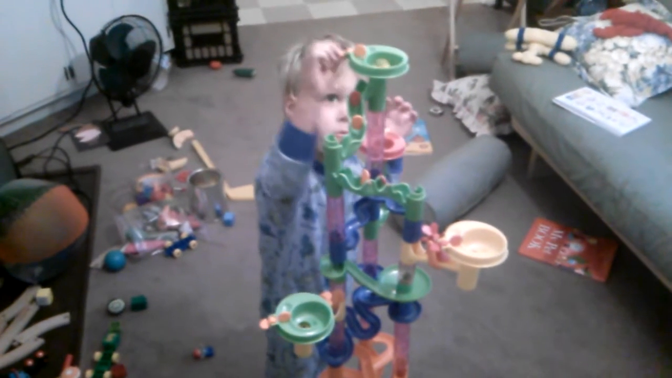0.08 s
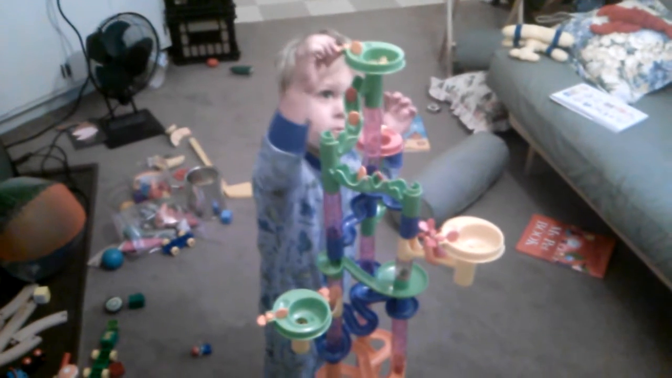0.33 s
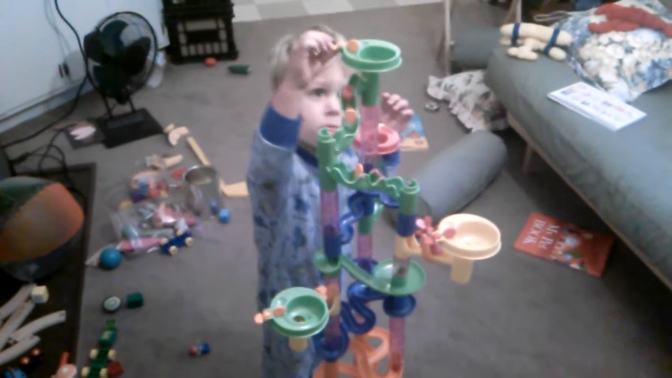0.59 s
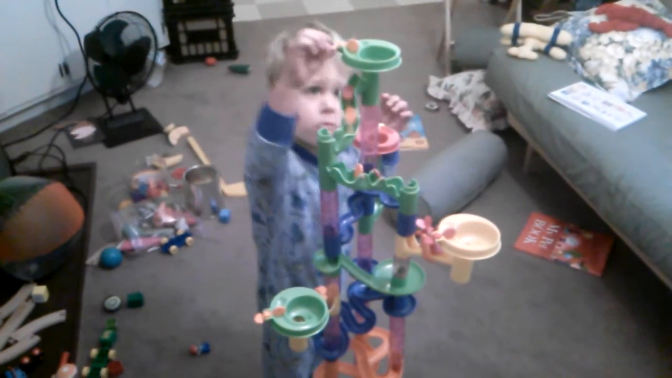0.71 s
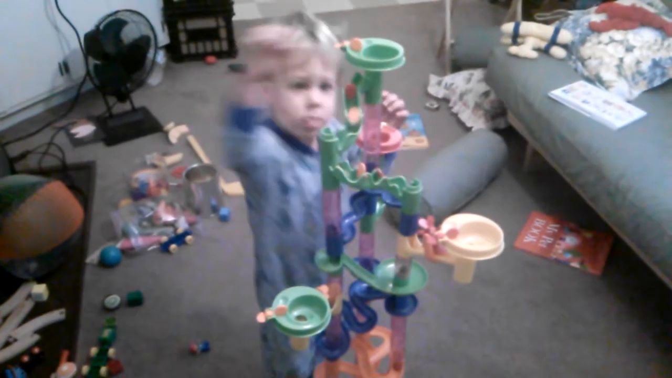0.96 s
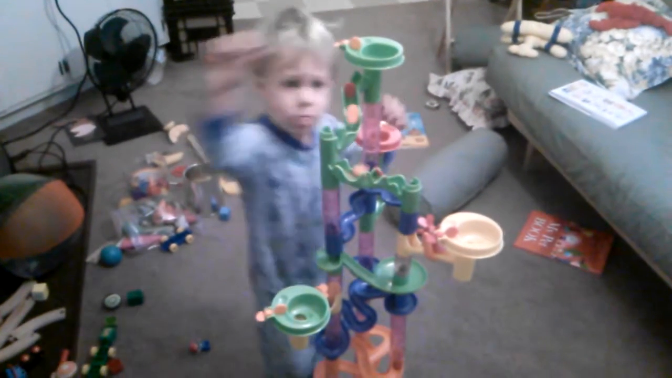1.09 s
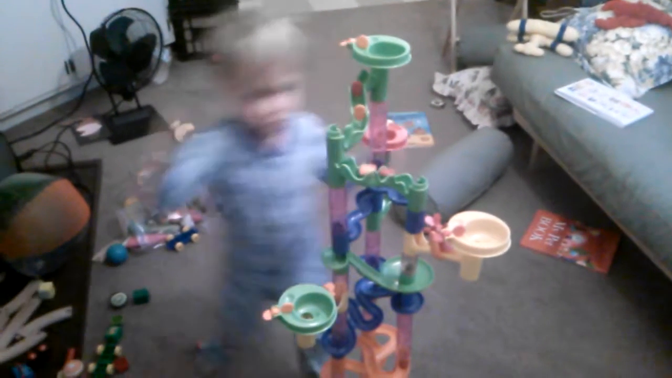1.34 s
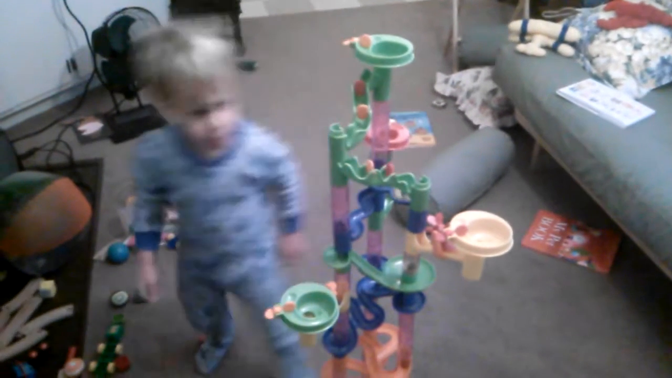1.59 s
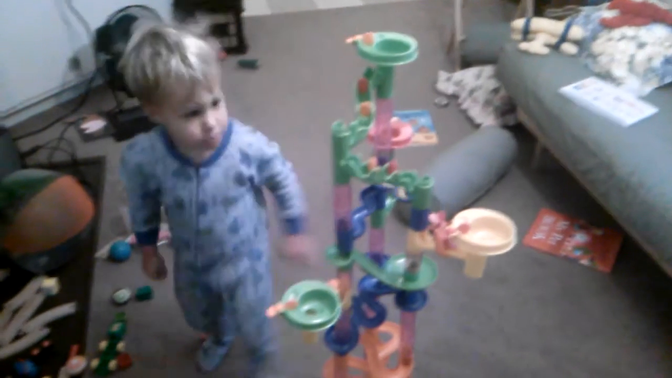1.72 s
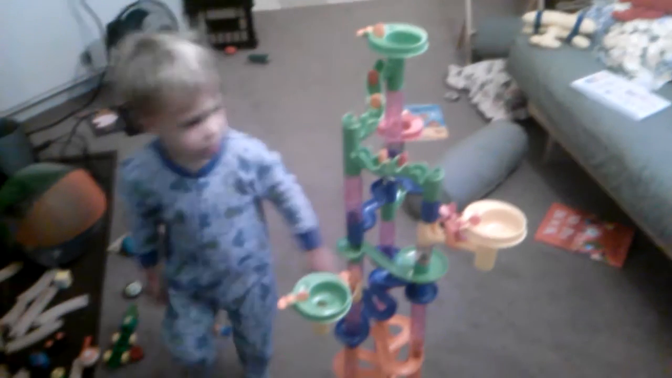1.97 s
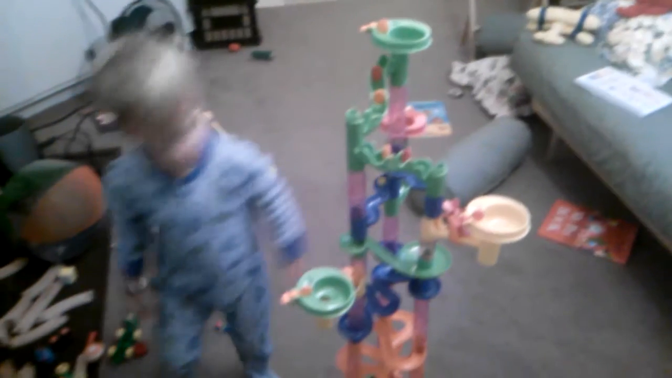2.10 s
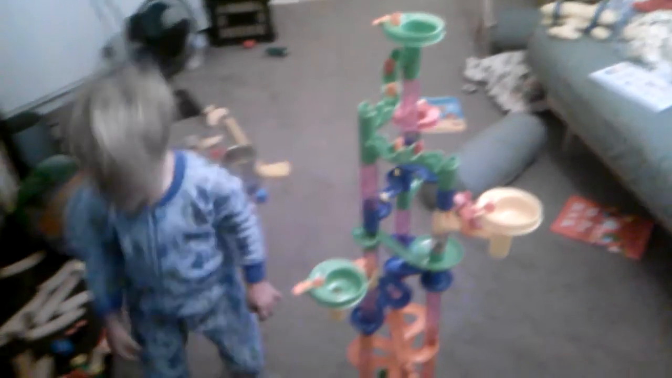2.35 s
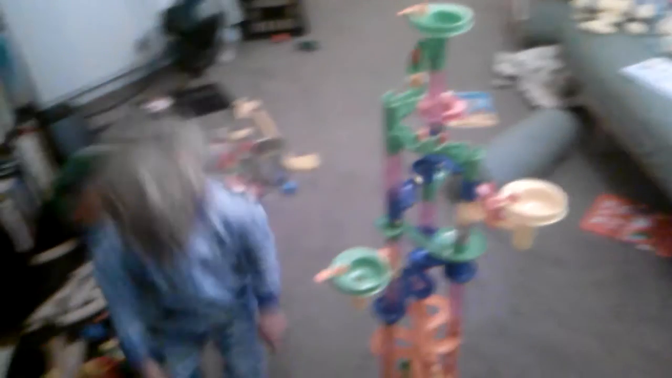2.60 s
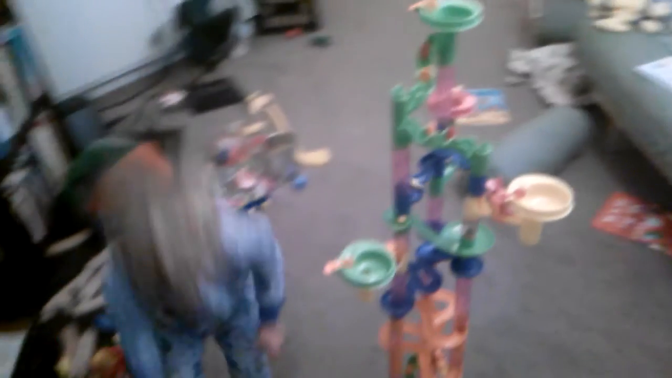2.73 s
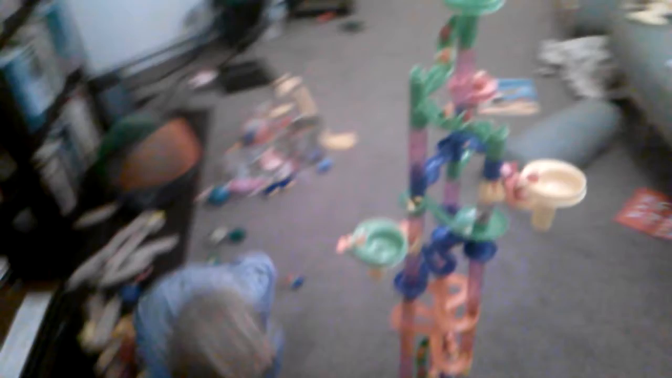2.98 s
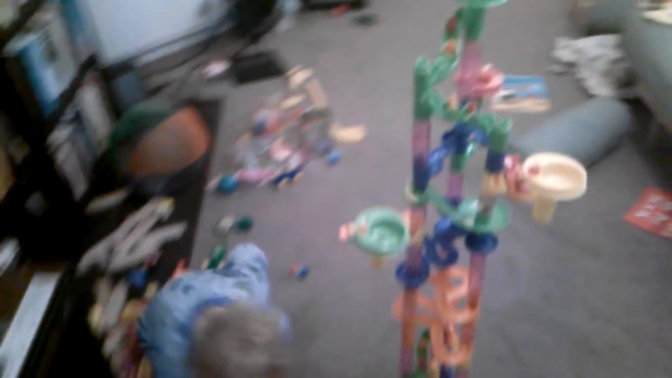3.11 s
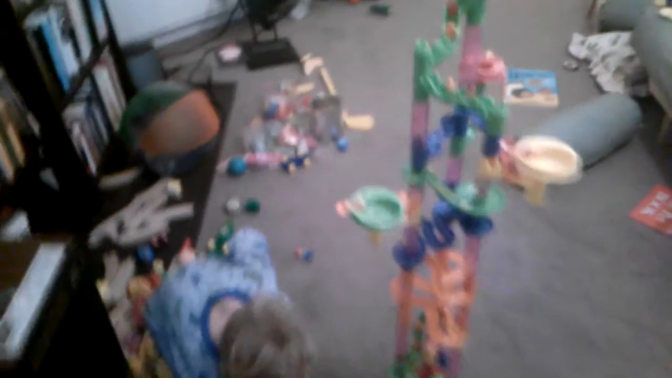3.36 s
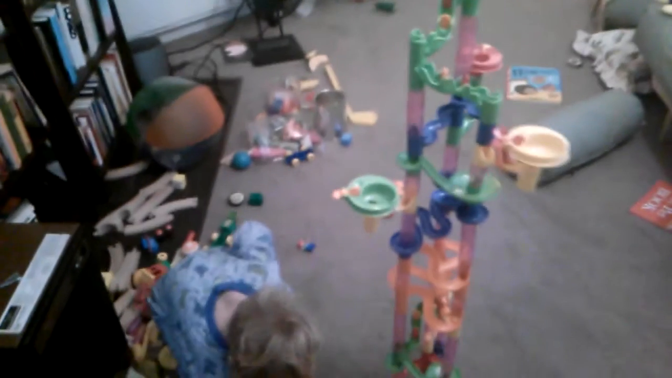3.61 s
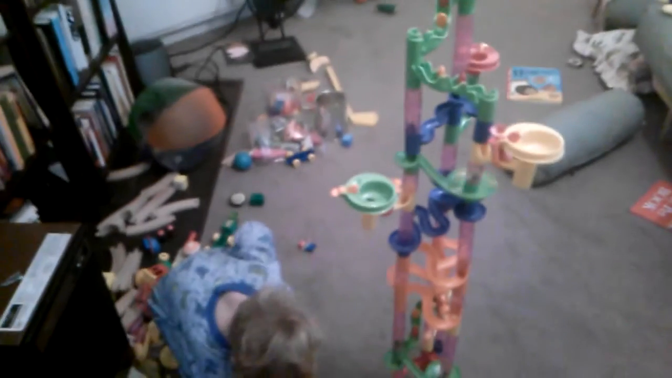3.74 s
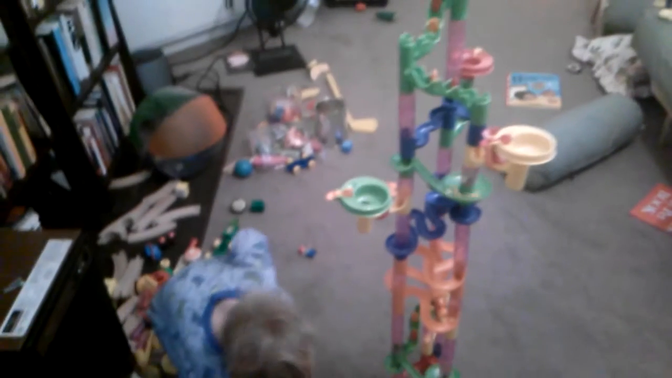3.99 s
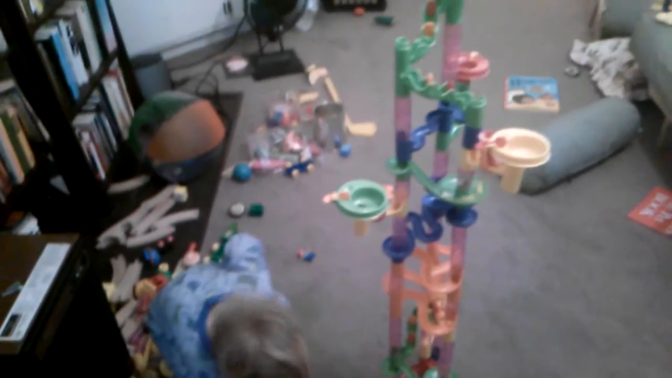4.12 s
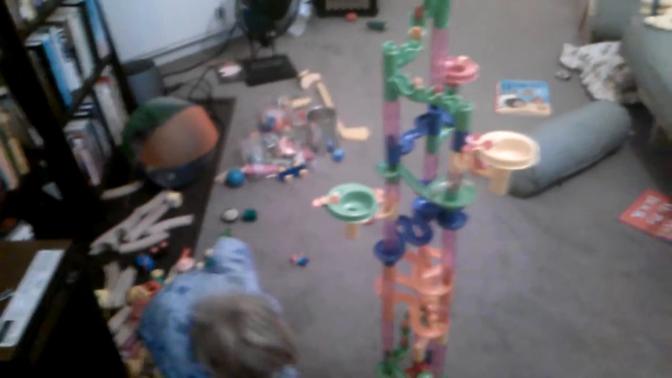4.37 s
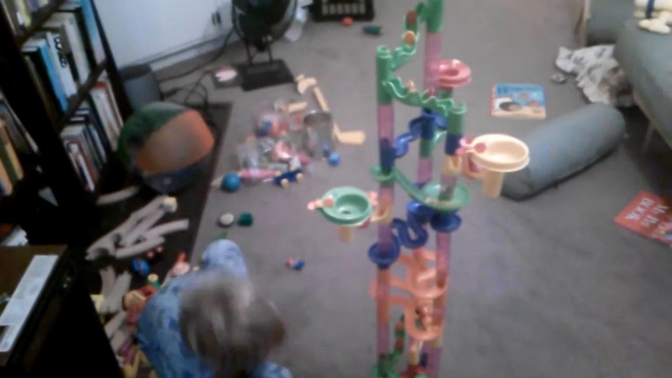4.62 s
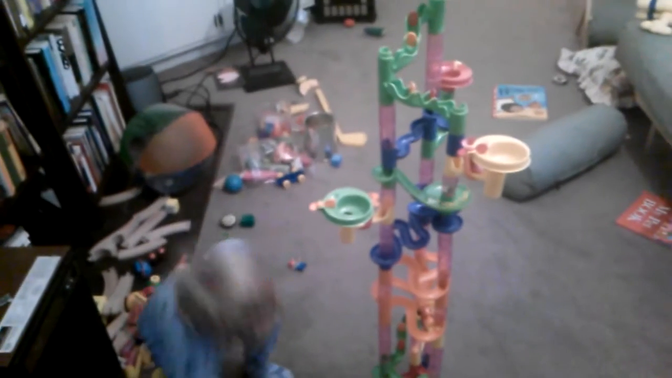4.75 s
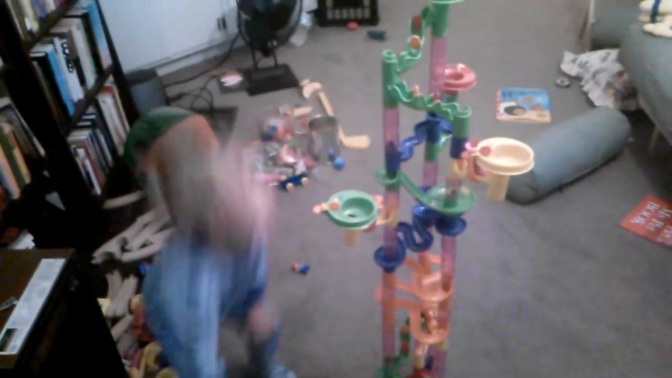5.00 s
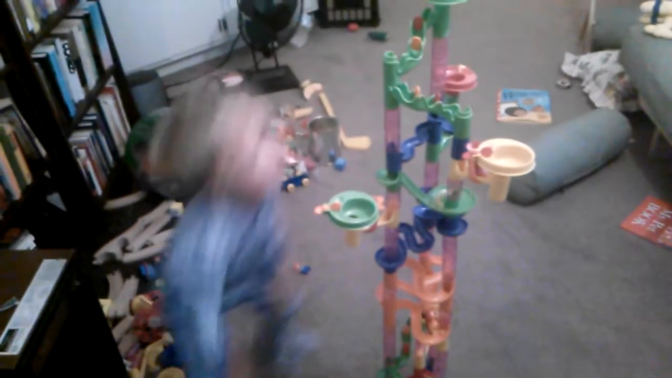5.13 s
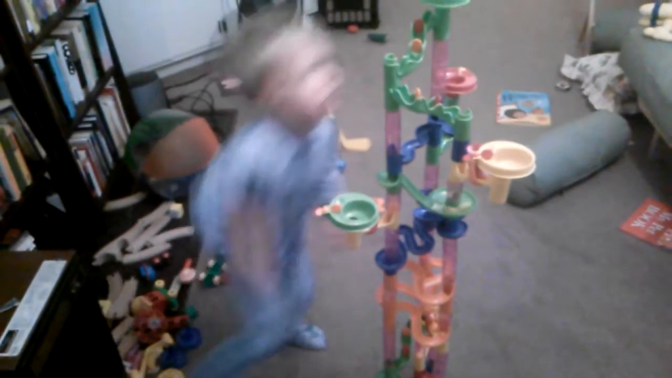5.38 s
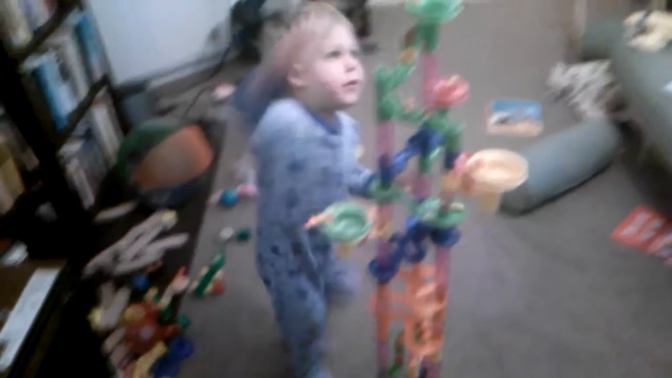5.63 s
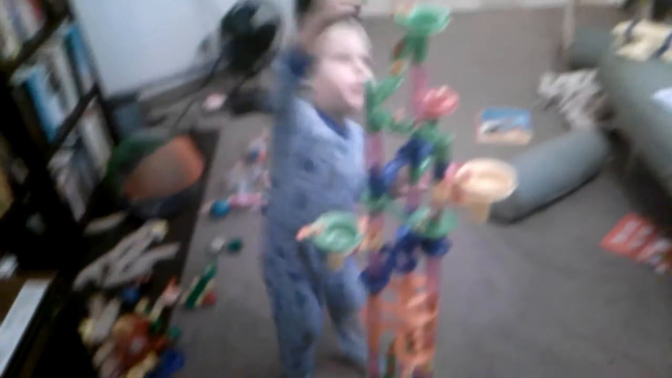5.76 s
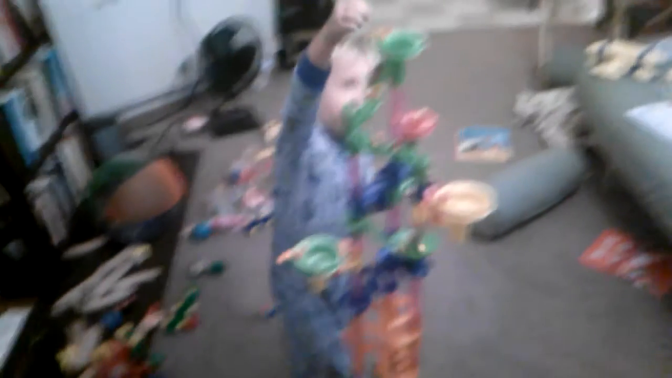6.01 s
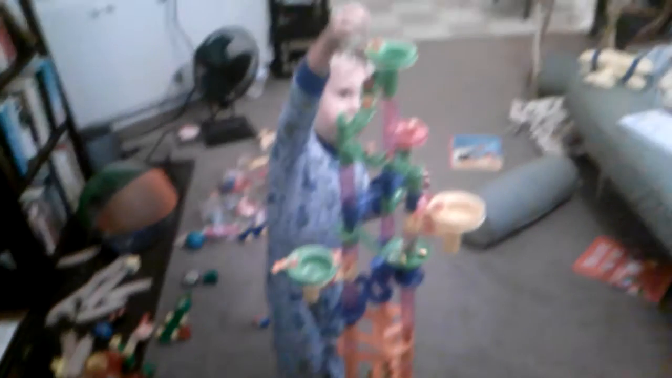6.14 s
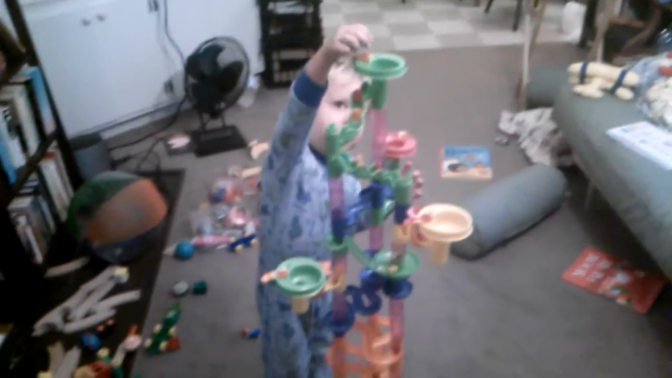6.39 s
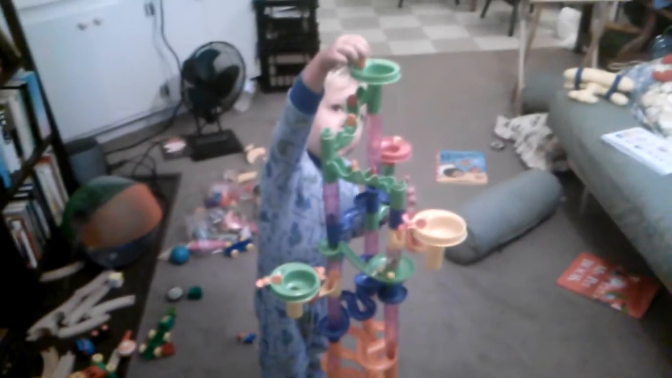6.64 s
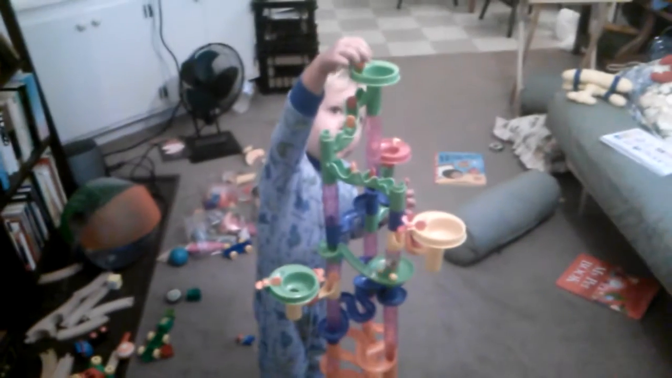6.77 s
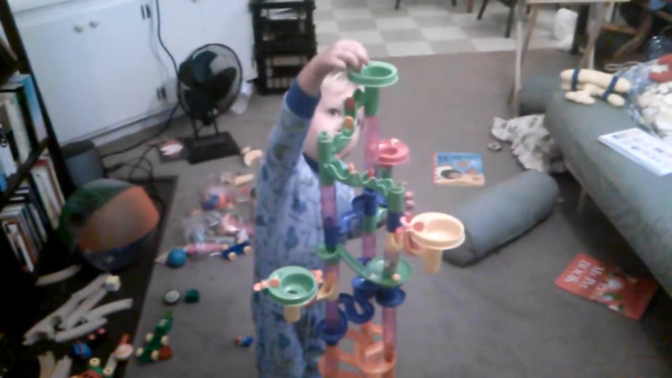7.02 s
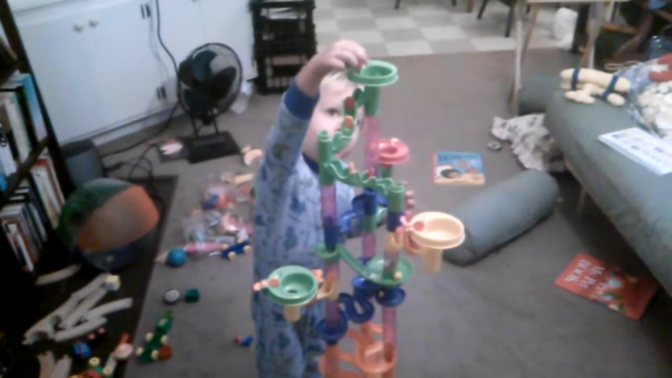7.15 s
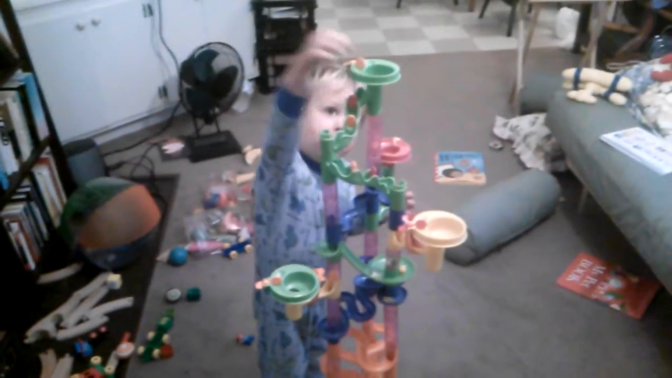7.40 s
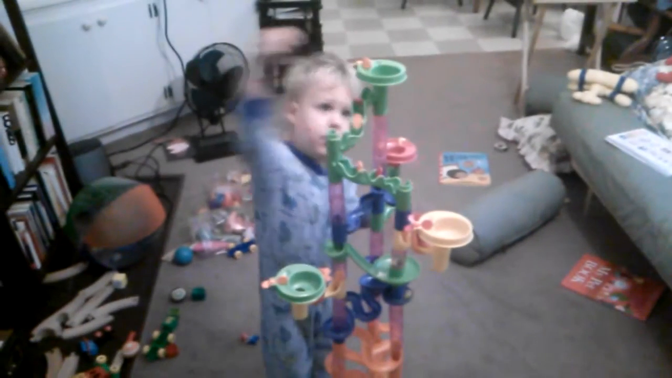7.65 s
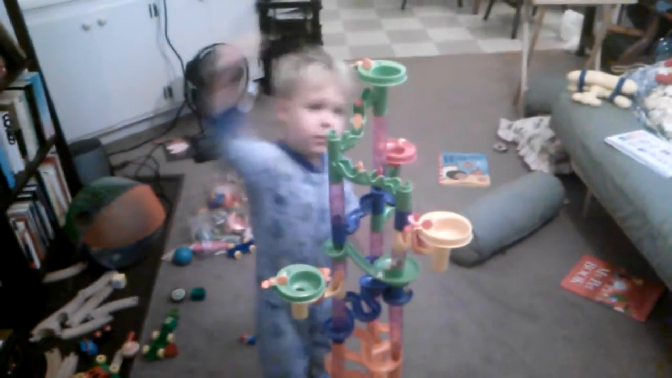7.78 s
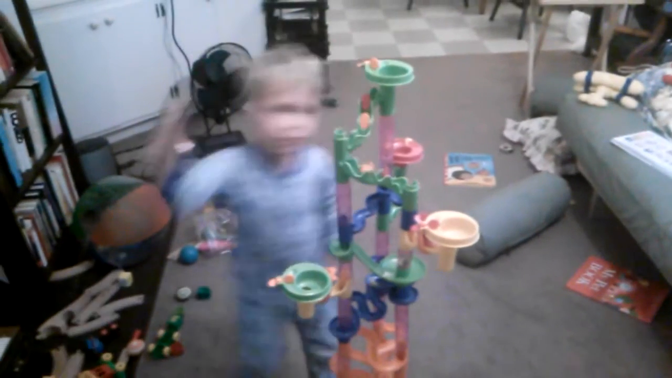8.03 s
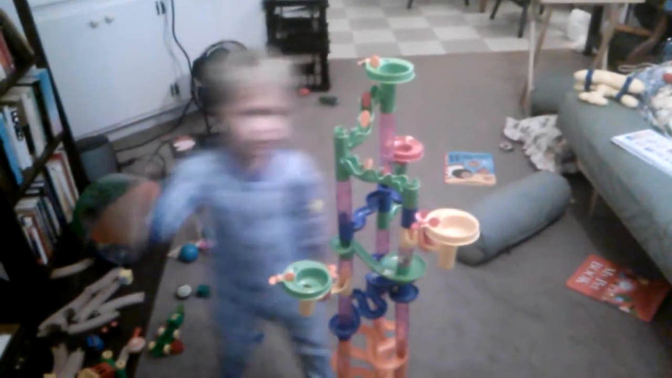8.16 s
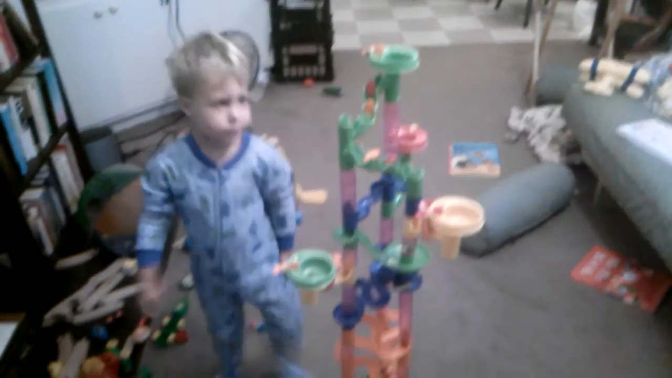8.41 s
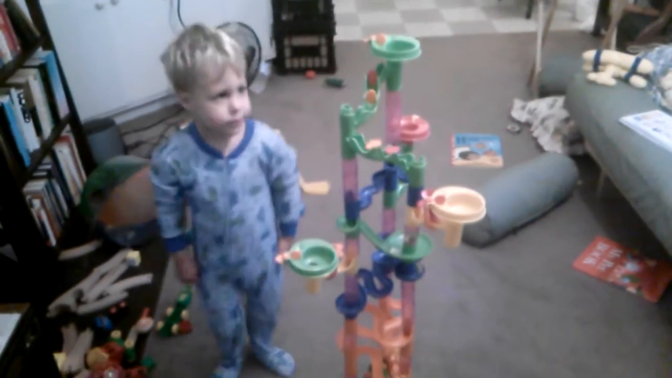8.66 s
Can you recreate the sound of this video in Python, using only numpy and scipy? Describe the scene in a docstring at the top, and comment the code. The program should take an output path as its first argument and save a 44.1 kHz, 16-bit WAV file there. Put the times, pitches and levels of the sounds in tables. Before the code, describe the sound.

Glass marbles clatter down a plastic toy tower in a carpeted room, about a metre from the microphone. From the start, sharp clicks with a short, hollow plastic ring come in quick clusters over a light rolling rattle, loudest from about 0.5 to 1.5 seconds. After a brief gap, more knocks follow from 2 to 3.1 seconds. From about 3.4 to 6.6 seconds it is much quieter: one marble circles a funnel with a gritty drone, swelling roughly every 0.7 seconds and gradually fading, with scattered light ticks. A few very faint, soft footsteps on carpet fall between 5 and 6 seconds. Clicks pick up again, and a second dense, loud run of clatter lasts from 7 to 8.3 seconds, ending with a small tick near 8.6. A quiet, steady room hum lies underneath throughout.

```python
"""Glass marbles knock down a plastic toy tower in a carpeted room, a small microphone a metre away.
Each knock on a chute, tube or other marble is a sharp crack, then a shiver of plastic and tube air.
Between knocks the marbles rattle over track seams; one circles a funnel, droning as it slows.
Faint ticks, a child's bare feet on the carpet and a quiet room hum lie underneath."""
import sys
import numpy as np
from scipy import signal
from scipy.fft import rfft, irfft, next_fast_len
from scipy.io import wavfile
from scipy.ndimage import uniform_filter1d, minimum_filter1d, map_coordinates

SR = 44100
rng = np.random.default_rng(int(sys.argv[2]) if len(sys.argv) > 2 else 0)


def generate_wav(sig):
    """Save sig (samples, or channels by samples) to the path in sys.argv[1] as 16-bit PCM at SR."""
    pcm = np.round(np.clip(np.atleast_2d(sig).T, -1, 1) * 32767).astype(np.int16)
    wavfile.write(sys.argv[1], SR, pcm)


N = 382347

# tube and chute modes: centre_hz, width_hz, gain_db
BODY_MODES = [(369.5, 16.5, -9.5), (1093, 43, -8.5), (1410, 33, -13), (2390, 16, -32.5), (2870, 30, 4),
              (3074, 51, 0), (3736, 830, -1.5)]
# thin plastic wall modes: centre_hz, width_hz, gain_db
WALL_MODES = [(4570, 550, -2.5), (5244, 39, 2), (5574, 220, -9.5), (6420, 400, -2), (7085, 220, -3)]
# stiff rim and glass modes: centre_hz, width_hz, gain_db
RIM_MODES = [(8786, 430, 11.5), (10800, 200, -5.5)]
# contact spectrum, low part: freq_hz, density_db
THUD_SPECTRUM = [(150, -57), (250, -31.5), (700, -19), (1200, -7.5), (2500, 1), (3600, -13), (5000, -11.5),
                 (8000, -29)]
# contact spectrum, high part: freq_hz, density_db
CLICK_SPECTRUM = [(5000, -28.5), (7500, -1.5), (9000, 6.5), (10500, 6), (12000, -9.5), (14200, -14)]

FUNNEL_ENTER_S, FUNNEL_LEAVE_S = 3.42, 6.65


def knocks():
    """A sharp crack, then the struck piece shivers out; lower parts speak later and longer."""
    # marble impacts: start_s, level_db, body_relative_db, walls_relative_db
    impacts = [(0.0293, -23, -14.5, -28), (0.0548, -25, -14.5, -23), (0.1072, -32.5, -11, -26),
               (0.2169, -32.5, -9, -23), (0.2843, -31, -11.5, -27), (0.3296, -25, -12, -26),
               (0.3444, -34, -7, -20), (0.397, -25.5, -16, -34), (0.4888, -24, -11.5, -28),
               (0.5112, -10, -12, -19.5), (0.5786, -20.5, -7.5, -17), (0.6145, -9.5, -13, -16),
               (0.6764, -14.5, -12, -10), (0.6938, -10, -13.5, -25), (0.8096, -4.5, -19.5, -10),
               (0.849, -12.5, -10.5, -15), (0.8934, -19, -11, -28), (0.9103, -6.5, -14.5, -11),
               (0.9552, -17, -7.5, -13), (1.0001, -16, -11.5, -14), (1.0134, -21.5, -8.5, -15),
               (1.075, -15.5, -9.5, -11.5), (1.1109, -12.5, -11.5, -14.5), (1.2266, -16, -20, -26),
               (1.3204, -3, -16.5, -9), (1.3468, -6.5, -11, -12), (1.3824, -14.5, -11, -12),
               (1.4114, -19, -7, -8), (1.4314, -18, -6.5, -8), (1.4726, -12.5, -8.5, -13),
               (1.5005, -18, -20, -13), (1.5354, -25, -8, -6), (1.952, -22.5, -6, -9),
               (1.9859, -10, -9.5, -11), (2.0487, -28, -5, -7), (2.0802, -29.5, -5, -11),
               (2.1256, -28.5, -1.5, -12), (2.151, -15.5, -9.5, -12), (2.1874, -18.5, -8, -5.5),
               (2.2378, -19.5, -8.5, -14), (2.4458, -38, -2.5, -14), (2.6404, -24, -1.5, -8),
               (2.6788, -10.5, -8.5, -15), (2.7227, -14.5, -12, -18), (2.7704, -21.5, -5, -22),
               (2.8124, -25, -5, -27), (2.8374, -25.5, -6.5, -27), (3.0021, -14.5, -11, -10),
               (3.051, -13.5, -9, -12), (3.1043, -15.5, -13, -22), (3.4665, -38.5, -3.5, -13),
               (3.5658, -38.5, -5.5, -10), (4.2587, -42, -3.5, -11), (4.342, -35.5, -25, -15),
               (4.4268, -40.5, -25.5, -22), (4.5476, -52.5, -31, -24), (5.5588, -42.5, -5, -13),
               (5.9444, -33, -3.5, -19), (6.0402, -54, 4, -9), (6.126, -27.5, -7.5, -11.5),
               (6.5615, -21.5, -26, -33), (6.6423, -34, -7, -13), (6.6792, -36, -5.5, -10.5),
               (6.8892, -27.5, -6.5, -13), (6.9546, -35.5, -10, -14), (7.023, -23.5, -4, -20),
               (7.028, -13, -12.5, -18), (7.0434, -17, -29, -16), (7.0688, -5.5, -13.5, -20.5),
               (7.1217, -10.5, -17, -22), (7.1594, -19.5, -5.5, -12), (7.2998, -21.5, -10.5, -24),
               (7.3178, -12, -15, -18), (7.3417, -14, -12, -11.5), (7.3826, -15.5, -11.5, -18),
               (7.429, -20.5, -11.5, -14), (7.4709, -27, -8, -22), (7.5068, -21, -41, -27),
               (7.5847, -16, -23.5, -23.5), (7.7004, -4.5, -20, -14), (7.7358, -10.5, -11.5, -10.5),
               (7.8111, -22.5, -9.5, -12), (7.8331, -15, -10.5, -21), (7.8725, -18, -10, -29),
               (7.9234, -18.5, -13, -18), (8.0114, -22.5, -3, -21), (8.0446, -15.5, -12, -14.5),
               (8.0745, -10, -12, -15.5), (8.1708, -16, -7.5, -13), (8.2097, -4.5, -18.5, -11),
               (8.2586, -15.5, -4, -5.5), (8.335, -26.5, -7, -8.5), (8.3709, -32, -3, -6),
               (8.5994, -42.5, -3.5, -7)]
    # air notes of the tubes: pitch_hz, level_db
    tube_notes = [(1922, -12.5), (2085, -12), (2454, -6.5), (2611, -10), (2755, -6), (3060, -6),
                  (3653, -1.5), (3998, -9)]
    # marble glints: pitch_hz, level_db, t60_s
    glass_modes = [(8900, 0, .011), (10300, 0, .011), (12100, -4, .011)]
    # contact spectrum, middle part: freq_hz, density_db
    clack_spectrum = [(2500, -92), (4000, -12), (5800, 32), (7200, -17), (10000, -51)]
    crack_rise_s, ring_t60_s = .0003, .099
    scatter_db, tube_detune, glass_detune = 4, .008, .04  # knock to knock
    ping_hz, ping_t60_s = 12150, .12
    t = np.arange(SR // 3) / SR
    click_power, clack_power, thud_power, tones = np.zeros((4, N + SR))
    tube_hz, tube_db = np.transpose(tube_notes)
    draws = rng.standard_normal((len(impacts), 4, len(tube_notes)))

    def strike(db, crack_t60_s, tail_gain, tail_t60_s, rise_s):
        decay = amp(-60 * t / crack_t60_s) + tail_gain * amp(-60 * t / tail_t60_s)
        return amp(db) * decay * (1 - np.exp(-t / rise_s))

    for (start_s, db, body_db, walls_db), (size, tune, shine, pitch) in zip(impacts, draws):
        onset = round(start_s * SR) - 15
        span = slice(onset, onset + len(t))
        click_power[span] += strike(db - 4.5, .014, .26, ring_t60_s, crack_rise_s) ** 2
        clack_power[span] += strike(db + walls_db + 2, .024, .44, 1.3 * ring_t60_s, .0025) ** 2
        thud_power[span] += strike(db + body_db + 2, .012, .41, 2.58 * ring_t60_s, .0029) ** 2
        tube_sines = np.sin(2 * np.pi * np.outer(tube_hz * (1 + tube_detune * tune), t))
        chord = amp(tube_db + scatter_db * size) @ tube_sines
        tones[span] += strike(db + body_db, .014, .45, .09, .0012) * chord
        for (hz, mode_db, t60_s), louder, sharper in zip(glass_modes, shine, pitch):
            decay = amp(mode_db + scatter_db * louder - 60 * t / t60_s)
            glint = decay * np.sin(2 * np.pi * hz * (1 + glass_detune * sharper) * t)
            tones[span] += amp(db - 9) * (1 - np.exp(-t / crack_rise_s)) * glint
        if body_db < -26:  # glass on glass rings on
            ping = np.sin(2 * np.pi * ping_hz * (1 + .01 * pitch[-1]) * t)
            tones[span] += amp(db - 20 - 60 * t / ping_t60_s) * ping
    click = np.sqrt(click_power[:N]) * plastic(CLICK_SPECTRUM, RIM_MODES, ring_db=-9)
    clack = np.sqrt(clack_power[:N]) * plastic(clack_spectrum, WALL_MODES, ring_db=4.5)
    thud = np.sqrt(thud_power[:N]) * plastic(THUD_SPECTRUM, BODY_MODES, ring_db=-2)
    return tones[:N] + click + clack + thud


def plastic(spectrum, modes, ring_db, patch_db=1.8):
    """Broad noise plus modal ring, rms 1. Contacts land on different parts, so bands swell in patches."""
    noise = unit(coloured_noise(spectrum) + amp(ring_db) * modal_noise(modes))
    bands = signal.stft(noise, nperseg=256)[2]
    bands = bands * amp(patch_db * patch_field(bands.shape, bins=5, frames=7))
    return unit(signal.istft(bands, nperseg=256)[1][:N])


def rolling():
    """Glass rolling on plastic: rattle and hiss on track and funnel, a drone in the funnel's modes."""
    # rattle along the track: time_s, level_db
    track_levels = [(0, -48), (.38, -56.5), (.79, -44.5), (1.45, -44.5), (1.66, -55), (1.93, -52),
                    (2.15, -41.5), (2.4, -50.5), (2.6, -61.5), (2.75, -47), (2.96, -59.5), (3.1, -40),
                    (3.3, -56), (3.9, -66), (6.85, -75.5), (7.3, -51), (7.42, -42.5), (7.66, -51),
                    (8.21, -44), (8.45, -55.5), (8.67, -58)]
    # funnel modes: centre_hz, width_hz, gain_db
    funnel_modes = [(1233, 21.5, 16), (1454, 39, 17), (1783, 79, 5.5)]
    lap_db, grit_t60_s = 4, 1.9
    t = np.arange(N) / SR
    track = amp(np.interp(t, *np.transpose(track_levels)))
    deep_laps, shallow_laps = circling(lap_db), circling(.57 * lap_db)
    grit = 1 + amp(10 - 60 * np.abs(t - FUNNEL_ENTER_S) / grit_t60_s)  # rough on entry, then smoother
    drone = modal_noise(funnel_modes) * shallow_laps * amp(1.5 * wobble(rate_hz=12))
    hops = seam_hops(rate_hz=80, spread_db=2, t60_s=.05)
    rattle = np.sqrt(hops) * plastic(THUD_SPECTRUM, BODY_MODES + WALL_MODES, ring_db=-7.5, patch_db=1.5)
    hiss = hops * plastic(CLICK_SPECTRUM, RIM_MODES + WALL_MODES, ring_db=-9, patch_db=4.5)
    rattle_gain = np.hypot(track, amp(-3.5) * grit * deep_laps)
    hiss_gain = np.hypot(amp(-8) * track, amp(-4.5) * grit * shallow_laps)
    return drone + rattle_gain * unit(rattle) + hiss_gain * unit(hiss)


def seam_hops(rate_hz, spread_db, t60_s):
    """Envelope of tiny random hops over track seams, on top of a smooth roll."""
    is_hop = rng.random(N) < rate_hz / SR
    energy = is_hop * amp(spread_db * np.minimum(rng.exponential(size=N), 2.5)) ** 2
    tail = amp(-120 * np.arange(SR // 10) / SR / t60_s)
    power = np.abs(signal.fftconvolve(energy, tail)[:N])
    return np.sqrt(1.2 + power / power.mean())


def circling(swell_db):
    """Envelope of the marble in the funnel: swells on each near pass, fades as it slows."""
    base_db, fade_db_per_s = -56, 1.96
    first_pass_s, lap_s, ease_s = 3.688, .702, .1
    t = np.arange(N) / SR
    inside = np.clip(np.minimum(t - FUNNEL_ENTER_S, FUNNEL_LEAVE_S - t) / ease_s, 0, 1)
    nearness = np.cos(2 * np.pi * (t - first_pass_s) / lap_s)
    return inside * amp(base_db - fade_db_per_s * (t - FUNNEL_ENTER_S) + swell_db * nearness)


def tube_ticks():
    """Faint taps, all sounding one tube's note."""
    # light taps: start_s, level_db
    taps = [(4.63, -52), (4.857, -55), (4.885, -57), (4.91, -57), (4.97, -53), (5.012, -51), (5.512, -53)]
    pitch_hz, t60_s, rise_s = 3720, .05, .0026
    t, out = np.arange(SR // 10) / SR, np.zeros(N)
    tick = amp(-60 * t / t60_s) * (1 - np.exp(-t / rise_s)) * np.sin(2 * np.pi * pitch_hz * t)
    for start_s, db in taps:
        out[round(start_s * SR):][:len(t)] += amp(db) * tick
    return out


def footsteps():
    """Bare feet on carpet: soft low puffs through the floor."""
    # footfalls: start_s, level_db
    footfalls = [(5.079, -64), (5.559, -63), (5.753, -59), (5.899, -54)]
    # footfall spectrum: freq_hz, density_db
    tread_spectrum = [(30, -7), (70, 6.5), (150, -1), (400, -25), (800, -62)]
    t60_s, rise_s = .5, .0033
    t, envelope = np.arange(SR // 3) / SR, np.zeros(N)
    puff = amp(-6.5 - 60 * t / t60_s) * (1 - np.exp(-t / rise_s))
    for start_s, db in footfalls:
        envelope[round(start_s * SR):][:len(t)] += amp(db) * puff
    return envelope * coloured_noise(tread_spectrum)


def room_reverb(x):
    """Room tail; each frequency dies at its own rate."""
    # room decay: freq_hz, t60_s
    decay_times = [(300, 0.48), (2000, 0.04), (5000, 0.2), (12000, 0.25)]
    hz, t, bands = signal.stft(rng.standard_normal(SR // 2), SR, nperseg=256)
    decay = amp(-60 * t / log_interp(decay_times, hz)[:, None])
    tail = signal.istft(bands * decay, SR, nperseg=256)[1]
    delayed = np.pad(x, (200, 0))
    return signal.fftconvolve(delayed, tail / np.linalg.norm(tail))[:N]


def room_hum():
    """Steady room and microphone noise."""
    # noise floor: freq_hz, density_db
    hum_spectrum = [(20, -36), (35, -9), (55, 1), (110, -6), (200, -8), (370, -5.5), (500, -11), (1000, -1),
                    (3000, -23.5), (6500, -18.5), (10000, -11.5), (14000, -21.5)]
    return amp(-64.5) * coloured_noise(hum_spectrum)


def amp(db):
    return 10 ** (np.asarray(db) / 20)


def unit(x):
    return x / np.sqrt(np.mean(x ** 2) + 1e-20)


def log_interp(points, hz):
    knot_hz, values = np.transpose(points)
    return np.interp(np.log(hz + 1), np.log(knot_hz + 1), values)


def wobble(rate_hz):
    """Smooth random curve."""
    knots = rng.standard_normal(int(N * rate_hz / SR) + 4)
    return map_coordinates(knots, [np.arange(N) * rate_hz / SR])


def patch_field(shape, bins, frames):
    """Smooth random time-frequency field, rms 1."""
    field = uniform_filter1d(rng.standard_normal(shape), size=bins, axis=0)
    return unit(uniform_filter1d(field, size=frames, axis=1))


def filtered(x, response):
    size = next_fast_len(N + SR // 2)
    return irfft(rfft(x, size) * response(np.fft.rfftfreq(size, 1 / SR)), size)[..., :N]


def coloured_noise(spectrum):
    return unit(filtered(rng.standard_normal(N), lambda hz: amp(log_interp(spectrum, hz))))


def modal_noise(modes):
    """Noise through causal resonators of alternating sign, rms 1."""
    def response(hz):
        return sum((-1) ** k * amp(db) * 1j * hz * width / (centre ** 2 - hz ** 2 + 1j * hz * width)
                   for k, (centre, width, db) in enumerate(modes))
    return unit(filtered(rng.standard_normal(N), response))


def scene():
    """Mono mix on two channels; reverb on knocks and ticks only."""
    hits = knocks() + tube_ticks()
    hum = room_hum()
    mono = hits + amp(-6.5) * room_reverb(hits) + rolling() + footsteps() + hum
    return np.array([mono, mono])


def record(dry):
    """Hardest cracks are rounded off; treble spreads in patches while lows and attacks stay centred."""
    # left-right difference: freq_hz, share_db
    side_share = [(3000, -78), (5000, -36), (8000, -0.5), (13000, -1.5)]
    # microphone treble roll-off: freq_hz, gain_db
    mic_response = [(14200, 0), (14600, -32), (15500, -40)]
    clip_level, cutoff_hz = 1.4, 15500
    dry = dry / (1 + np.abs(dry / clip_level) ** 4) ** .25
    hz, _, bands = signal.stft(dry[0], SR, nperseg=1024)
    magnitude = uniform_filter1d(np.abs(bands), size=9, axis=0)
    steady = minimum_filter1d(magnitude, size=3, axis=1)  # drops attacks
    is_wide = patch_field(bands.shape, bins=40, frames=5) > .3
    random_phase = np.exp(2j * np.pi * rng.random(bands.shape))
    side_gain = amp(log_interp(side_share, hz) + 5)[:, None]
    side = signal.istft(steady * random_phase * is_wide * side_gain, SR, nperseg=1024)[1][:N]
    return filtered(dry + [side, -side], lambda f: amp(log_interp(mic_response, f)) * (f < cutoff_hz))


dry = scene()
out = record(dry)
generate_wav(out)
```